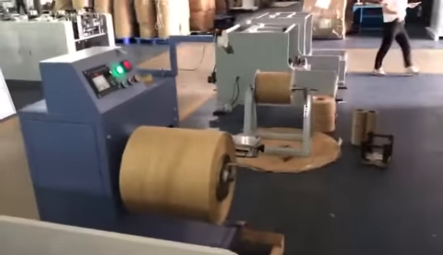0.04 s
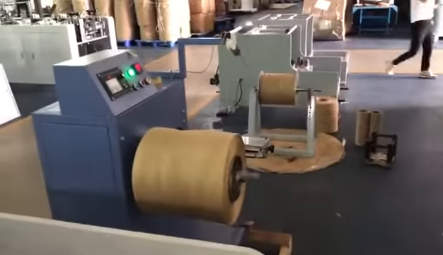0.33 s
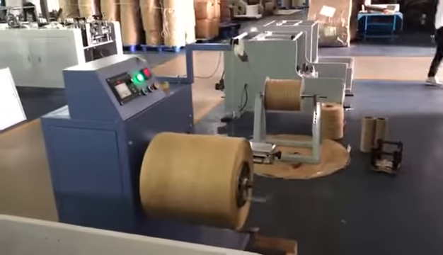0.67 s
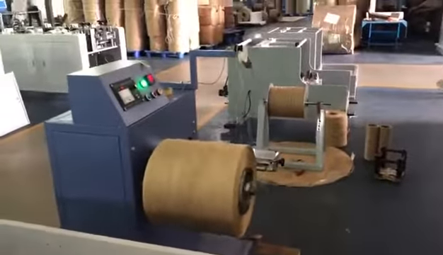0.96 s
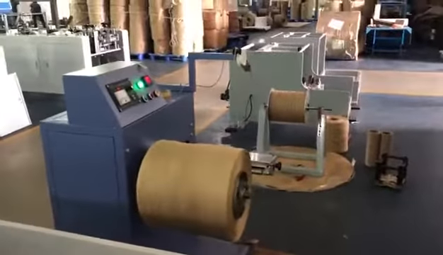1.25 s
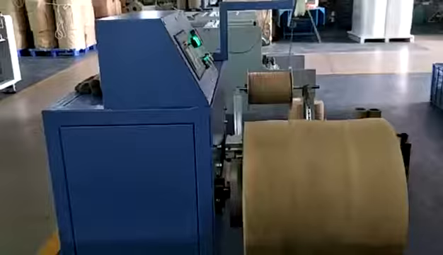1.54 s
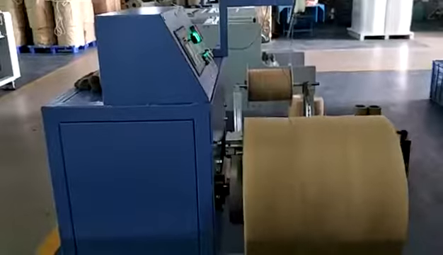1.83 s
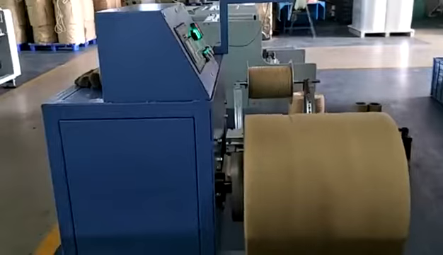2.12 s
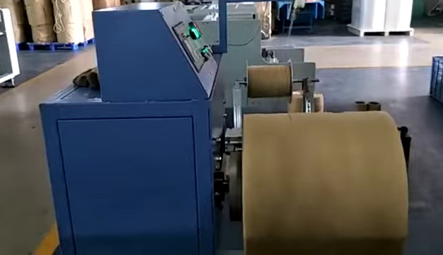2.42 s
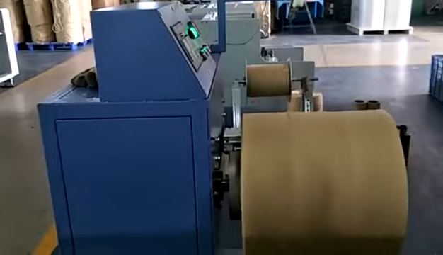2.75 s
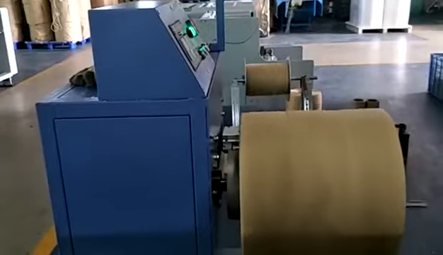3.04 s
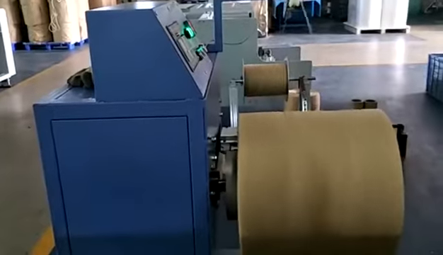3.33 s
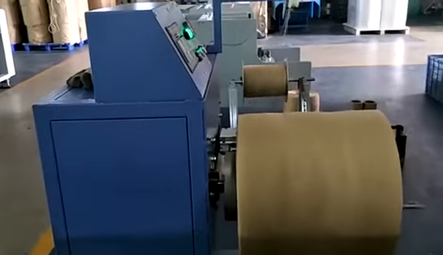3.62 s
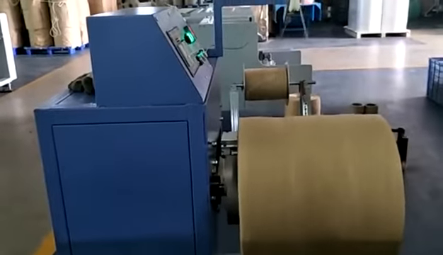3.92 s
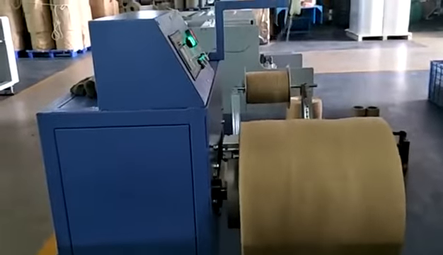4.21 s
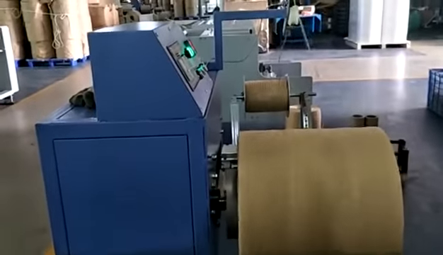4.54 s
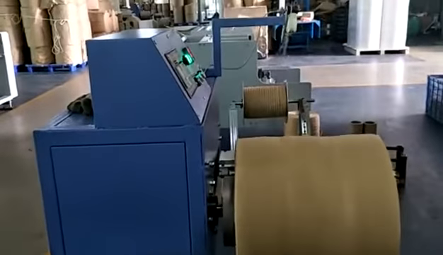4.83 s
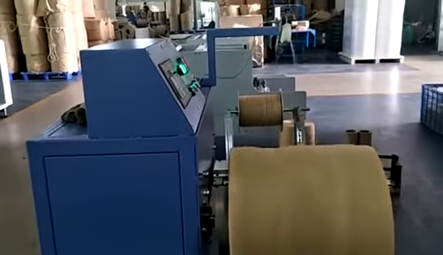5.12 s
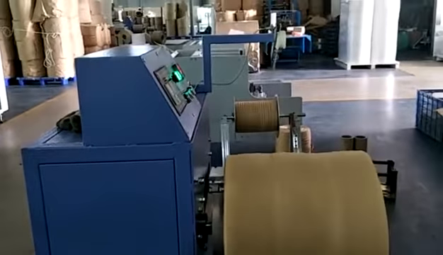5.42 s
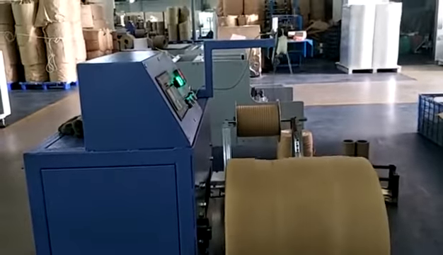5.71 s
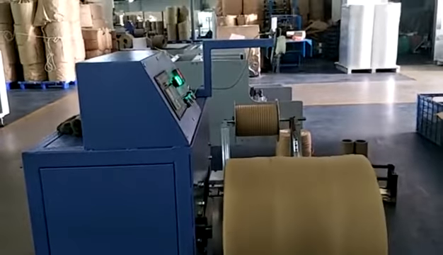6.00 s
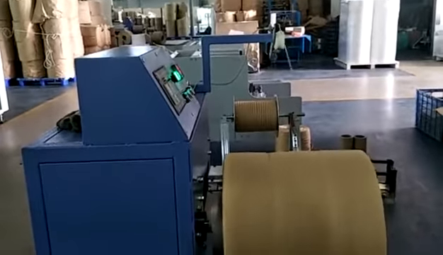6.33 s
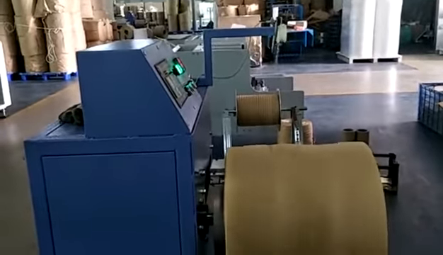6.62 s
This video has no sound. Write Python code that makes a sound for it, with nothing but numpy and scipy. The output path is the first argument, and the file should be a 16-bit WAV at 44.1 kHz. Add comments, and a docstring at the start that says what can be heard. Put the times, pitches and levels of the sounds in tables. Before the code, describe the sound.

A rope winding machine runs in a factory hall. At first it is a few steps away and in mono: the turning spool makes an even low rumble in the steel frame, rope rushes over the guides, and motor and gears whine faintly. At about 1.6 seconds the sound fades into a brief silence.

At about 2 seconds it returns in stereo, right beside the spool. A low throbbing drone and motor hum sit under the rushing rope, ringing rollers and a dense, light rattle of small steel parts. The frame surges roughly every 0.6 seconds, with smaller jerks between. The machine grows steadily louder and brighter as a slightly warbly hiss comes up. Near 4.9 seconds the rope gives one short, hoarse squeak, then scrapes in bright, rough spurts until the end at about 7 seconds.

```python
"""A rope rewinding machine in a factory hall. The microphone starts a few steps away, in mono: the turning
spool shakes the steel frame into a rumble, rope rushes over the guides, motor and gears whine faintly.
After a short pause it stands beside the spool, in stereo: the frame surges with every stroke of the
rope guide and small steel parts rattle. The machine grows steadily louder and brighter, and toward
the end the rope squeaks once and scrapes in spurts."""
import sys
import numpy as np
from scipy import signal
from scipy.fft import rfft, irfft, next_fast_len
from scipy.io import wavfile
from scipy.ndimage import uniform_filter1d, map_coordinates

SR = 44100
rng = np.random.default_rng(int(sys.argv[2]) if len(sys.argv) > 2 else 0)


def output_pcm(signal):
    """Save a mono or channel-first signal as 16-bit PCM at the path in sys.argv[1].

    Samples are clipped to [-1, 1] before scaling.
    """
    pcm = np.clip(np.atleast_2d(signal).T, -1, 1) * 32767
    wavfile.write(sys.argv[1], SR, np.round(pcm).astype(np.int16))


N = 302526
TIME = np.arange(N) / SR
FAR_END_S, NEAR_START_S = 1.619, 2.026

def amp(db):
    """Decibels to gain."""
    return 10 ** (np.asarray(db) / 20)

def unit(x):
    """Scaled to rms 1."""
    return x / np.sqrt(np.mean(x ** 2) + 1e-20)

def along(points, hz):
    """(Hz, value) points read on a log axis."""
    f, v = np.transpose(points)
    return np.interp(np.log(hz + 1), np.log(f + 1), v)

def curve(points):
    """(seconds, value) points joined by straight lines."""
    return np.interp(TIME, *np.transpose(points))

def swells(rows):
    """Bell-shaped rises and dips of level, in dB."""
    return sum(db * np.exp(-((TIME - centre) / width) ** 2) for centre, width, db in rows)

def wobble(rate):
    """A smooth random curve, rate knots a second."""
    knots = rng.standard_normal(int(N * rate / SR) + 4)
    return map_coordinates(knots, [TIME * rate], order=3, mode="nearest")

def filtered(x, response):
    """x times a response of frequency."""
    m = next_fast_len(N + SR // 2)
    return irfft(rfft(x, m) * response(np.fft.rfftfreq(m, 1 / SR)), m)[..., :N]

def coloured(x, spectrum):
    """x given a spectrum, at rms 1."""
    return unit(filtered(x, lambda hz: amp(along(spectrum, hz))))

def rung(x, modes):
    """x passed through resonances with steep skirts, at rms 1."""
    peak = lambda f, c, w: 1j * f * w / (c * c - f * f + 1j * f * w)
    power = lambda f: sum(amp(db) ** 2 * abs(peak(f, c, 2 * w)) ** 4 for c, w, db in modes)
    return unit(filtered(x, lambda f: np.sqrt(power(f))))

def dropouts(x, depths):
    """Brief random holes in small patches, as from audio compression; depths are (Hz, dB) points."""
    hz, _, bins = signal.stft(x, SR, nperseg=1024)
    patches = rng.standard_normal(bins.shape[-2:])
    for _ in range(2):
        patches = uniform_filter1d(uniform_filter1d(patches, size=2, axis=0), size=3, axis=1)
    gain = amp(along(depths, hz)[:, None] * np.minimum(unit(patches), 0))
    gain /= np.sqrt(np.mean(gain ** 2, axis=1, keepdims=True))
    return signal.istft(bins * gain, SR, nperseg=1024)[1][..., :N]

# The rumble from a few steps away. Each row: frequency in Hz, relative level in dB.
FAR_RUMBLE = [(15, -43), (25, -31), (56, -3.5), (80, 2.5), (118, 0), (158, 0.5), (193, -4), (252, -0.5),
              (321, -2), (355, -5.5), (409, -3.5), (458, -15), (520, -15.5), (680, -35.5), (1140, -120)]
def far_rumble(db):
    """The turning spool shakes the machine into a low noise."""
    return amp(db) * coloured(rng.standard_normal(N), FAR_RUMBLE)

# The frame's resonances. Each row: frequency in Hz, width in Hz, relative level in dB.
PANEL_MODES = [(198.2, 14, -0.1), (234.5, 10, 2), (264.4, 25, 0.9), (301.7, 13, 3), (351, 22, 3),
               (384, 29, -0.4), (436.6, 25, -9)]
def frame_panels(shaking, db):
    """The panels of the steel frame ring as the spool shakes them."""
    return amp(db) * rung(shaking, PANEL_MODES)

# The rope from a few steps away. Each row: frequency in Hz, relative level in dB.
FAR_RUSH = [(260, -20.5), (450, -3), (632, -4.5), (736, -1.5), (810, -2), (951, -7), (1140, -5.5),
            (1300, -7), (1540, -9.5), (1770, -9.5), (2570, -11.5), (3210, -14), (4200, -16), (7370, -20),
            (9580, -38.5), (16200, -120)]
def far_rope(db):
    """Rope rasps over the guides; dropouts, as from audio compression, make the treble warble."""
    rasp_db = 0.24 * wobble(16.6) + 0.95 * wobble(110)
    rush = coloured(rng.standard_normal(N), FAR_RUSH)
    return amp(db + rasp_db) * dropouts(rush, depths=[(500, 0.79), (7000, 8.2)])

def whine(tones, drift_hz, waver_db):
    """Motor and gear tones, each drifting at random in pitch and, by waver_db, in level."""
    phase = lambda hz: 2 * np.pi * (np.cumsum(hz + drift_hz * wobble(14)) / SR + rng.random())
    return sum(np.sqrt(2) * amp(db + waver_db * wobble(6.3)) * np.sin(phase(hz)) for hz, db in tones)

# Motor and gears from a few steps away. Each row: frequency in Hz, relative level in dB.
FAR_TONES = [(149.7, -8), (250.4, -6), (351.3, -7.5), (497.4, -17), (729.3, -23.5), (1454.7, -18),
             (1628.6, -21.5), (1975.6, -26.5)]
# The load rises twice. Each row: centre in seconds, width in seconds, relative swell in dB.
LOAD_SWELLS = [(0.38, 0.046, 1.7), (0.96, 0.16, 1.6)]
def machine_far():
    """A few steps away, in mono: even running, apart from two swells of the load."""
    load_db = swells(LOAD_SWELLS)
    rush_db = -31.5 + 0.93 * load_db
    rumble = far_rumble(-28 + 0.52 * load_db)
    frame = frame_panels(rng.standard_normal(N), -36.5 + 4.2 * load_db)
    rope = far_rope(rush_db)
    drive = amp(rush_db - 1) * whine(FAR_TONES, drift_hz=2.6, waver_db=0)
    return rumble + frame + rope + drive

# The hall's sound beside the spool. Each row: frequency in Hz, left-right correlation.
HALL_CORRELATION = [(70, .991), (170, .975), (260, .92), (430, .88), (770, .48), (1020, .53), (1300, -.1),
                    (1700, -.2), (2200, .2), (3100, -.1), (4000, .04), (7000, .04)]
def diffuse():
    """Noise from all round the hall at two microphone ports: alike in the bass, unrelated in the treble."""
    turn = lambda hz: np.arccos(np.clip(along(HALL_CORRELATION, hz), -1, 1)) / 2
    shares = lambda hz: np.array([np.cos(turn(hz)), np.sin(turn(hz))])
    mid, side = filtered(rng.standard_normal((2, N)), shares)
    return np.array([mid + side, mid - side])

def run_up(start_db, db_per_s):
    """The level in dB of a part that grows as the drive gathers speed."""
    return start_db + db_per_s * (TIME - NEAR_START_S)

# The spool up close. Each row: frequency in Hz, relative level in dB.
DRONE_SPECTRUM = [(12, -54.5), (22, -19.5), (36, -11.5), (52, -6.5), (66, -3), (88, 1), (108, -0.5),
                  (125, -0.5), (160, 2), (185, -3), (230, -27.5), (440, -120)]
# Its slow rise. Each row: time in seconds, base level in dB.
DRONE_LEVEL = [(2.3, -31), (2.9, -30.5), (3.2, -29), (4.1, -28.5), (4.8, -25), (5.6, -25.5), (6.7, -24)]
def spool_drone(surge_db, turns_per_s=19.0):
    """The unbalanced spool drones and throbs once a turn."""
    throb_db = 0.9 * np.sin(2 * np.pi * turns_per_s * TIME)
    return amp(curve(DRONE_LEVEL) + throb_db + surge_db) * coloured(diffuse(), DRONE_SPECTRUM)

# The rope up close. Each row: frequency in Hz, relative level in dB.
NEAR_RUSH = [(260, -34.5), (440, -4), (501, -4), (648, -4.8), (687, -3), (759, -6.5), (900, -7), (1120, -7),
             (1280, -12), (1480, -9.5), (1580, -9.5), (1740, -13.5), (1960, -8), (2130, -12.5),
             (2570, -13.5), (3300, -14), (4260, -25), (4700, -30), (6110, -62), (10300, -120)]
def near_rope(db):
    """Rope rushes over the guides next to the microphone."""
    return amp(db) * coloured(diffuse(), NEAR_RUSH)

# Roller and bracket resonances. Each row: frequency in Hz, width in Hz, relative level in dB.
ROLLER_MODES = [(542, 12, 1.5), (628, 8, -1.5), (689, 19, 2.5), (800, 16, 0.5), (1030, 27, -0.5),
                (1152, 13, 2.5), (1215, 7.6, -1.5), (1340, 13, -2.5), (1580, 10, -4.5), (1620, 9, 0.5),
                (1963, 13, -1.5), (2020, 21, -2), (2307, 24, -6), (2430, 8.8, -7.5), (2714, 26, -5.5),
                (2980, 23, -8.5)]
def guide_rollers(db):
    """The running rope rings the guide rollers and their brackets."""
    return amp(db) * rung(diffuse(), ROLLER_MODES)

# The rattle's tone colour. Each row: frequency in Hz, relative level in dB.
RATTLE_SPECTRUM = [(800, -18), (1100, 0.5), (1250, -4.5), (1600, -1.5), (1750, -5), (2000, -1.5),
                   (2400, -2), (3100, -6.5), (3800, -8.5), (4400, -11.5), (5200, -33)]
def steel_rattle(db, per_s=750, low_hz=955, high_hz=4487, attack_s=0.0028, t60_s=0.16, spread_db=2):
    """Many light contacts between steel parts, each ringing at its own pitch from its own direction."""
    t = np.arange(SR // 6) / SR
    when, pitch, phases, direction = rng.random((int(per_s * N / SR), 4)).T
    starts = (when * N).astype(int)
    gains = amp(spread_db * rng.standard_normal(len(starts)))
    pitches_hz = low_hz + (high_hz - low_hz) * pitch
    envelope = amp(-60 * t / t60_s) * (1 - np.exp(-t / attack_s))
    out = np.zeros((2, N + len(t)))
    for start, hz, phase, angle, gain in zip(starts, pitches_hz, phases, np.pi * direction, gains):
        ring = gain * envelope * np.sin(2 * np.pi * (hz * t + phase))
        out[:, start:start + len(t)] += np.outer([np.cos(angle), np.sin(angle)], ring)
    return amp(db) * coloured(out[:, :N], RATTLE_SPECTRUM)

# Gear tones and motor hum up close. Each row: frequency in Hz, relative level in dB.
GEAR_TONES = [(689, -15), (1148, -25.5), (1622.7, -27), (1966.3, -25), (2485.9, -16.5), (4973, -44)]
MOTOR_HUM = [(125, -6.5)]
def near_drive(db):
    """The gears whine differently on each side; the motor hums in the middle."""
    gears = np.array([whine(GEAR_TONES, drift_hz=2.2, waver_db=2.2) for _ in range(2)])
    hum = whine(MOTOR_HUM, drift_hz=3.02, waver_db=0.5)
    return amp(db - 3.5) * gears + amp(db - 0.5) * hum

# The fibres' hiss. Each row: frequency in Hz, relative level in dB.
HISS_SPECTRUM = [(2710, -35.5), (4600, -1), (4860, -1.5), (6050, -0.5), (7370, -9.5), (9580, -44),
                 (16200, -120)]
# It comes up late. Each row: time in seconds, relative level in dB.
HISS_LEVEL = [(2.3, -54.5), (3.34, -53.5), (3.53, -51.5), (4.56, -51), (5.57, -46), (6.6, -43)]
def fibre_hiss(lift_db):
    """The fibres of the running rope hiss in the treble."""
    return amp(curve(HISS_LEVEL) + lift_db) * coloured(diffuse(), HISS_SPECTRUM)

def rope_squeak(start_s, length_s, from_hz, to_hz, arch_hz, db):
    """The rope slips once on a guide: a short, hoarse squeak that arches and falls."""
    progress = np.clip((TIME - start_s) / length_s, 0, 1)
    arch = np.sin(np.pi * progress)
    hz = from_hz + (to_hz - from_hz) * progress + arch_hz * arch + 30 * wobble(230)
    return amp(db) * arch * np.sin(2 * np.pi * np.cumsum(hz) / SR)

# The scrape's tone colour. Each row: frequency in Hz, relative level in dB.
SCRAPE_SPECTRUM = [(2000, -28.5), (2700, -2), (3250, -2), (3800, -0.5), (4150, 1), (4420, -2), (4620, -4.5),
                   (4720, -18.5), (5600, -49.5)]
# Its spurts. Each row: centre in seconds, width in seconds, swell in dB.
SCRAPE_SPURTS = [(4.95, 0.049, 5), (5.06, 0.029, 9), (5.21, 0.078, 10), (5.38, 0.06, 4), (5.615, 0.025, 11),
                 (5.9, 0.096, 5.5), (6.11, 0.04, 9), (6.205, 0.054, 9.5), (6.5, 0.061, 6), (6.83, 0.051, 8)]
def rope_scrape():
    """The rope scrapes over a guide in bright, rough spurts."""
    db = run_up(-55, db_per_s=3.3) + swells(SCRAPE_SPURTS) + 1.5 * wobble(160)
    return amp(db) * coloured(diffuse(), SCRAPE_SPECTRUM)

# The microphone's balance. Each row: frequency in Hz, left minus right in dB.
PORT_BALANCE = [(140, -0.5), (260, -0.9), (1500, 0), (1900, -0.2), (3500, 1.5), (4800, 0), (5900, -9.5),
                (6900, -13)]
def microphone_ports(hz):
    """Left and right gains at constant total power; the left port is dull in the treble."""
    ratio = amp(along(PORT_BALANCE, hz))
    return np.array([ratio, np.ones_like(hz)]) * np.sqrt(2 / (1 + ratio ** 2))

# The rope's pull. Each row: centre in seconds, width in seconds, relative swell or dip in dB.
TUGS = [(2.48, 0.05, 5.5), (2.72, .04, 3), (3.11, 0.078, 2.5), (3.33, 0.034, 1.5), (3.71, 0.054, 4.5),
        (4.06, 0.03, 3), (4.19, 0.036, 3), (4.305, 0.05, 3.5), (4.53, 0.034, 1.5), (4.891, 0.047, 6),
        (5.512, .028, 7), (5.76, 0.028, 5), (6.135, 0.048, 7), (6.73, 0.019, 6.5)]  # the guide turns round about every 0.6 s, with lesser jerks between
SLACKS = [(2.85, 0.16, -2.5), (4.41, 0.05, -3.5), (5.96, 0.022, -2)]  # the rope runs slack and the shaking eases
RASPS = [(3.05, 0.062, 1.5), (3.74, 0.036, 1.5), (4.35, 0.037, 1.3), (4.59, 0.021, -0.5), (4.96, 0.08, 0.5),
         (5.8, 0.036, 1), (6.49, 0.037, 2.5), (6.72, .04, -1)]  # the rope rasps louder or softer for a moment
# Warbly treble, as from audio compression. Each row: frequency in Hz, typical dropout depth in dB.
DROPOUT_DEPTHS = [(400, .5), (1000, 2), (1450, 7), (2500, 7), (4400, 8), (5400, 3), (6400, 3), (7400, 5)]
def machine_near():
    """Beside the spool, in stereo: the machine grows louder while the rope tugs and slackens."""
    tension_db = 0.42 * wobble(7.7)  # the rope's tension wanders a little
    frame_db = run_up(-28, db_per_s=1.87) + tension_db
    rush_db = run_up(-31.5, db_per_s=2.02) + tension_db
    rattle_db = run_up(-40.5, db_per_s=2.62) + tension_db
    tug_db, slack_db, rasp_db = swells(TUGS), swells(SLACKS), swells(RASPS)
    chatter = wobble(90)  # the twisted rope catches and slips on the guides
    drone = spool_drone(0.33 * tug_db + 0.7 * slack_db)
    frame = frame_panels(diffuse(), frame_db + tug_db + slack_db + 0.94 * chatter)
    rope = near_rope(rush_db - 0.5 + rasp_db + 0.3 * slack_db + 0.8 * chatter)
    rollers = guide_rollers(rush_db - 7.5 + rasp_db)
    fibres = fibre_hiss(4 + 0.42 * tug_db + 1.2 * chatter)
    scrape = rope_scrape()
    steel = steel_rattle(rattle_db + rasp_db + 0.3 * slack_db)
    drive = near_drive(rush_db)
    squeak = rope_squeak(start_s=4.915, length_s=0.085, from_hz=2600, to_hz=2500, arch_hz=60, db=-29.5)
    warbled = dropouts(rope + scrape + fibres + steel, DROPOUT_DEPTHS)
    return filtered(drone + frame + warbled + rollers + drive + squeak, microphone_ports)

def fade(away_s, length_s, least):
    """Gain away from the silent pause: a 3 ms edge, and a straight rise from least to 1."""
    edge = np.clip(away_s / 0.003, 0, 1)
    return edge * np.clip(least + (1 - least) * away_s / length_s, 0, 1)

def scene():
    """Two microphone positions, far then near, with a silence between them."""
    far = machine_far() * fade(FAR_END_S - TIME, length_s=0.36, least=0.22)
    near = machine_near() * fade(TIME - NEAR_START_S, length_s=0.23, least=0.12)
    return far + near

def record(dry, top_hz=7650):
    """The phone keeps nothing above its band limit."""
    return filtered(dry, lambda hz: np.clip((top_hz - hz) / 80, 0, 1))

dry = scene()
out = record(dry)
output_pcm(out)
```